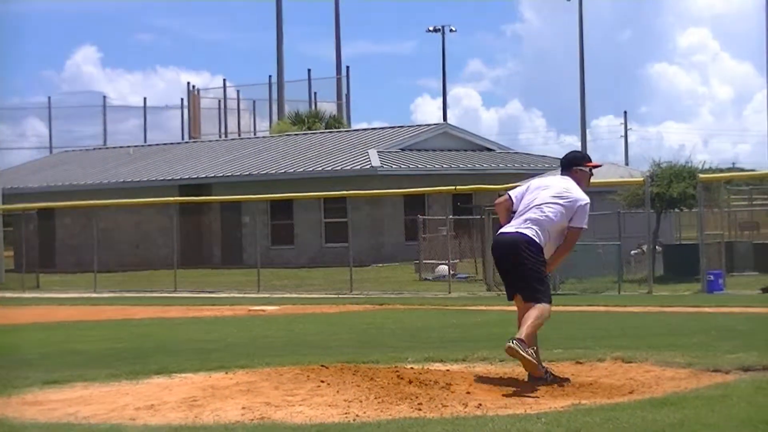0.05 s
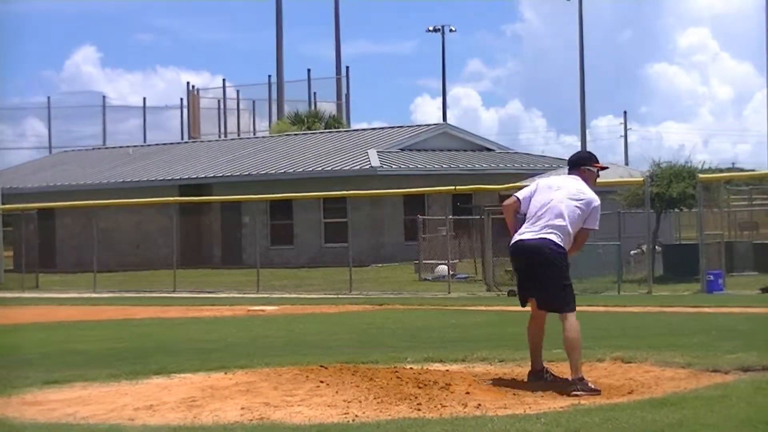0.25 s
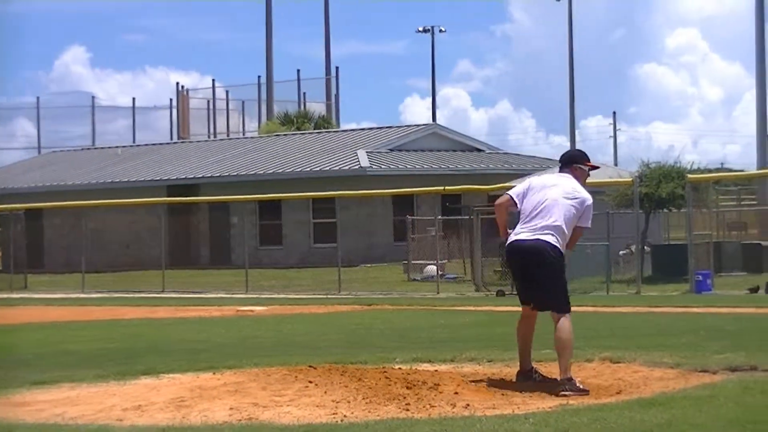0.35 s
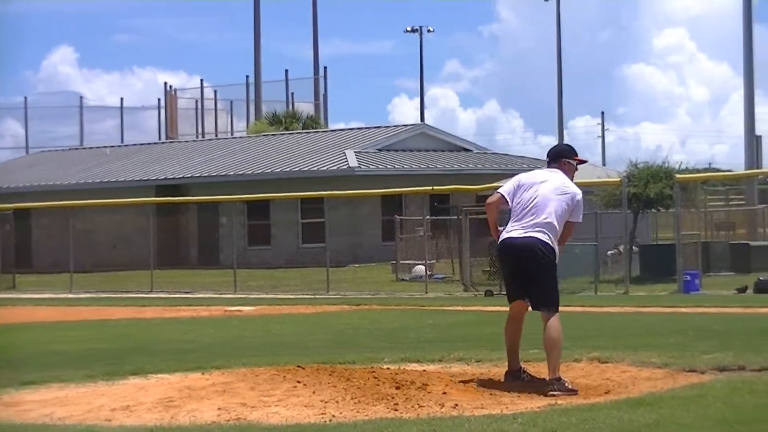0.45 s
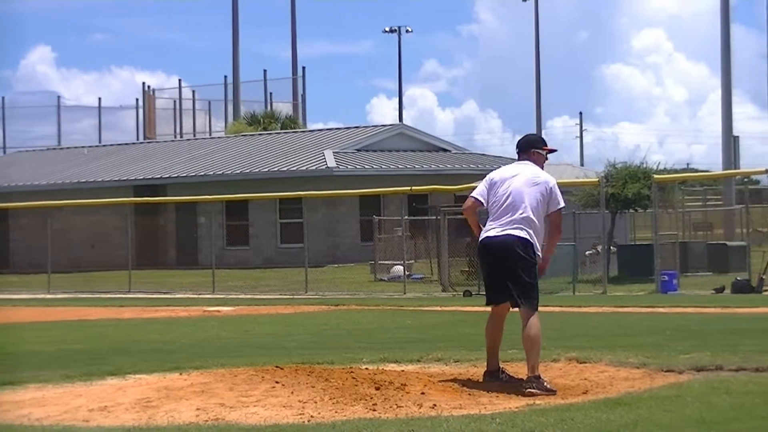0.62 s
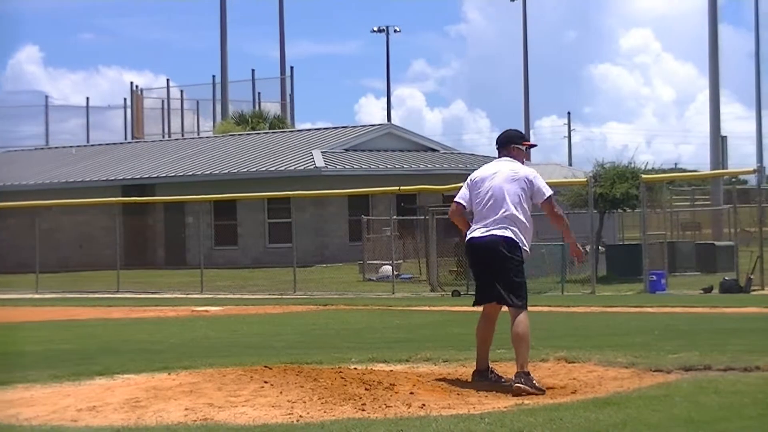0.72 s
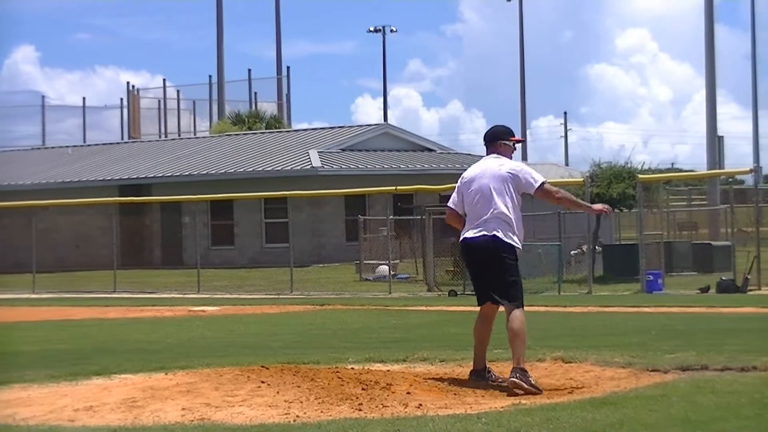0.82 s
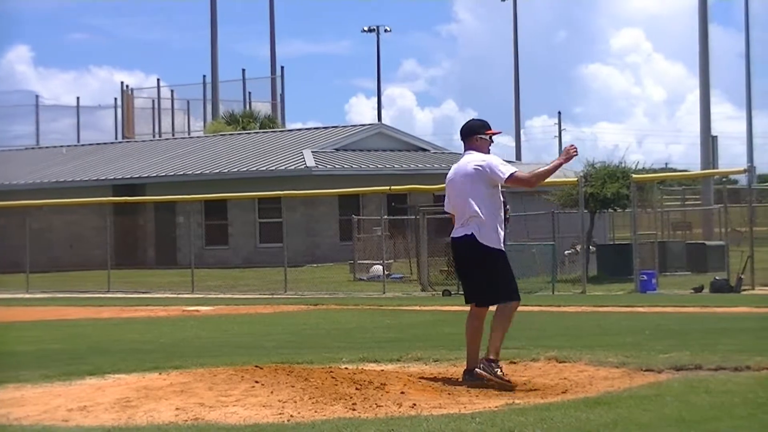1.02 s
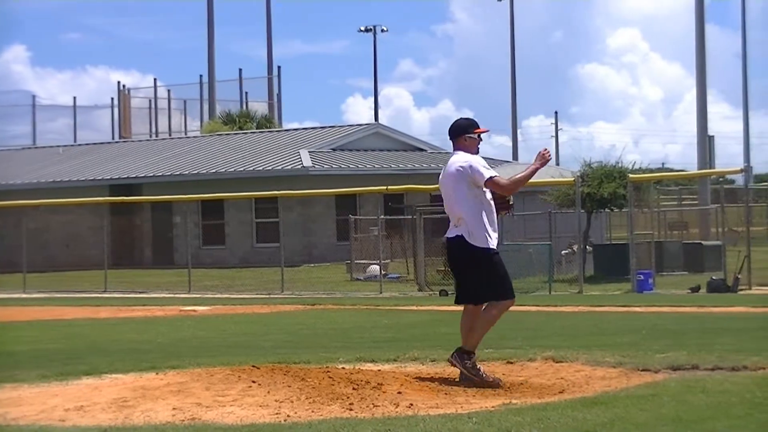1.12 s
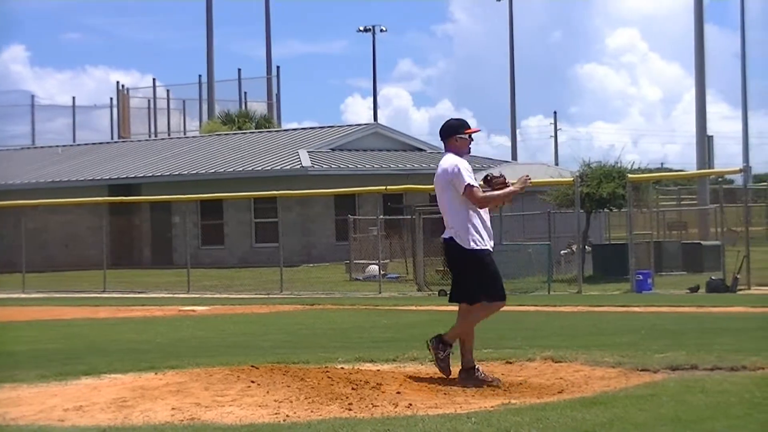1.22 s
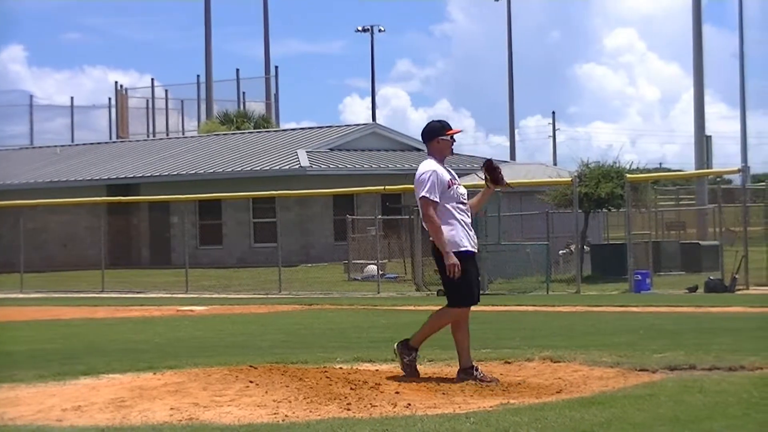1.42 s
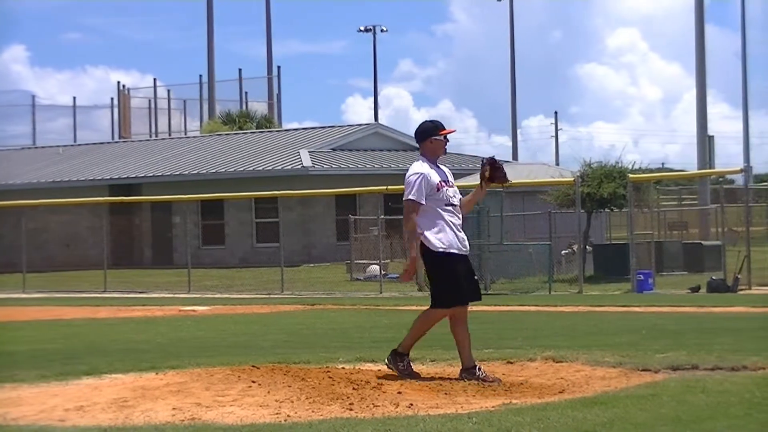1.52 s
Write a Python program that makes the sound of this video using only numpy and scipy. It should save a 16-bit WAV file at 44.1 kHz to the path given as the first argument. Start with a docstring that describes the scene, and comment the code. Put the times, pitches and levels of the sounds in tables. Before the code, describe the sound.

Close by on an outdoor ball field, a ball smacks once into a catcher's mitt. The crack bounces back in several quick slaps and fades, leaving a quiet, pulsing insect buzz and a far-off rumble.

```python
"""Catcher's mitt on an open ball field

Close to a stereo microphone, a pitched baseball cracks into a mitt and sets the leather ringing.
Fences and buildings farther off throw the crack back as distinct slaps and a scattered tail.
Out in the field, insects buzz in regular swells and a few faint taps sound over a distant rumble."""
import sys
import numpy as np
from scipy import signal
from scipy.fft import rfft, irfft
from scipy.io import wavfile
from scipy.ndimage import uniform_filter1d, map_coordinates

SR = 44100
rng = np.random.default_rng(int(sys.argv[2]) if len(sys.argv) > 2 else 0)


def wav_out(sig):
    """Save sig, one row per channel (or a flat mono array), as 16-bit PCM at SR to the path in sys.argv[1]."""
    wavfile.write(sys.argv[1], SR, np.round(np.clip(np.atleast_2d(sig).T, -1, 1) * 32767).astype(np.int16))


N = 68355
CATCH_S, ECHO_PAN_DB = .2426, -1

# Ring of the leather pocket and ball: f/Hz, relative level/dB, t60/s
MITT_MODES = [(235, -27, 0.01), (653, -26, .022), (1510, -11.5, 0.0034), (1837, -1, 0.0042),
              (3120, -15, 0.0099), (3860, 5, 0.0034), (4460, 1, 0.0031), (5540, -9, .003),
              (6930, -17.5, 0.011), (10350, -1, 0.0014), (11000, -14, 0.0018), (13700, -28, 0.0033)]
# Slaps off fences and walls, as they reach the microphone: t/s, relative level/dB, smear/s
SLAPS = [(0.263, -22, 0.0007), (0.2656, -17.5, 0.00063), (0.2846, -35, .0005), (0.297, -39, .002),
         (0.3149, -21, .001), (.3198, -18.5, .001), (.3402, -45, .001), (.3602, -30, .001),
         (0.3916, -24.5, 0.00058), (0.4568, -25, 0.00047), (0.4694, -27, 0.0036), (.4778, -29.5, .0012),
         (.5297, -28.5, 0.00033), (0.5855, -38, .004), (.5988, -36, .002), (0.6928, -29, .003)]
# Colour of those surfaces: f/Hz, gain/dB
SURFACE_COLOUR = [(300, -19), (1200, -12), (2100, 7.5), (3800, -4), (6000, -1.5), (10000, -4)]
# Colour of the scattered tail, and the filter that dulls it later on: f/Hz, gain/dB
SCATTER_COLOUR = [(200, -28), (700, -3), (1200, -8.5), (2000, 2.5), (2700, -5), (4000, -3), (5500, -6),
                  (8000, -10.5), (11000, -19.5), (15000, -46)]
LATE_COLOUR = [(4500, 6), (7000, -7.5), (12000, -33)]
# Dull returns from the buildings: t/s, level/dB, decay/s
BUILDING_RETURNS = [(.284, -35, 0.026), (0.357, -43, 0.034)]
# Colour of those returns: f/Hz, gain/dB
BUILDING_COLOUR = [(150, -13), (280, -1.5), (500, -3), (900, -3.5), (1500, -7), (4000, -55)]
# Crests of the insect buzz: t/s, relative level/dB
INSECT_SWELLS = [(.07, -1), (0.189, -1.5), (.31, -21), (.42, 0), (.53, -0.5), (.645, -1.5), (.755, -3),
                 (.805, -6), (.88, -3), (1.0, -0.5), (1.11, -0.5), (1.215, -1.5), (1.325, 0), (1.43, -2),
                 (1.515, -0.5)]
# Colour of the buzz: f/Hz, gain/dB
INSECT_COLOUR = [(4000, -68), (5700, -8), (6500, 3), (7200, 3.5), (8200, 2), (9200, -4.5), (10400, -13),
                 (12500, -66), (16000, -30)]
# Faint taps around the field: t/s, level/dB, decay/s, band centre f/Hz
FIELD_TAPS = [(.029, -46, 0.0052, 2500), (.045, -43.5, 0.01, 875), (.763, -41, 0.00066, 2000),
              (1.532, -41, 0.0017, 1780), (1.533, -47, 0.0073, 620)]
# Colour of the distant rumble: f/Hz, gain/dB
RUMBLE_COLOUR = [(25, -38), (60, -23), (110, -14.5), (200, -2.5), (330, -3), (600, 2), (930, 4.5),
                 (1400, 0), (2200, -5.5), (3800, -8.5), (5300, -13), (10000, -17), (15500, -28)]
# Stereo width of the rumble: f/Hz, side against mid level/dB
RUMBLE_WIDTH = [(50, -5), (300, -11), (1000, -16.5), (3000, -10), (10000, -28)]
# Imbalance of the two microphone capsules: f/Hz, left minus right level/dB
CAPSULE_BALANCE = [(60, -7), (125, -1.5), (250, 0.5), (500, 1.4), (1000, 0.5), (2800, 1.5), (5500, -1.7),
                   (13000, 0)]


def mitt(t, contact_s=.0001):
    """The ball's push sets the heavily damped leather ringing for a few milliseconds."""
    ring = sum(undb(db) * np.sin(2 * np.pi * hz * t) * fade(t, t60 / np.log(1000))
               for hz, db, t60 in MITT_MODES)
    return undb(1.5) * ring * (1 - fade(t, contact_s))


def catch(t, crack, graze_lead_s=.000381, ground_lag_s=.0022, thud_lag_s=.006, thud_hz=930):
    """Close up: the ball grazes, then seats; the crack bounces off the ground; the padding gives way."""
    age = t - CATCH_S
    delayed = lambda lag: map_coordinates(crack, [(age - lag) * SR])
    graze = undb(-10.5) * cut(delayed(-graze_lead_s), 3020, "high", order=1)
    ground = undb(-16) * cut(delayed(ground_lag_s), 5000, "low")
    padding = burst(age - thud_lag_s, decay_s=.0035)
    thud = undb(-30) * np.sqrt(SR / thud_hz / 2) * cut(padding, thud_hz, "low")
    close = pan(graze + delayed(0), -1.8) + pan(ground, 4) + pan(thud, 6)
    return cut(close, 177, "high", order=1)


def slap_echoes(t, crack, top_hz=10900, air_per_s=2.37):
    """Each fence or wall smears the crack by its depth; the air dulls the farther ones."""
    paths = sum(undb(db) * cut(smear(t - at, spread), top_hz * np.exp(-air_per_s * (at - CATCH_S)), "low")
                for at, db, spread in SLAPS)
    slaps = signal.fftconvolve(paths, crack)[:N]
    return pan(colour(slaps, SURFACE_COLOUR), ECHO_PAN_DB)


def scatter(t, fence_start_s=.2755, fence_end_s=.392, tail_start_s=.261, tail_t60_s=1):
    """Countless small reflections off near fences and the open field form a grainy tail that darkens."""
    age = np.maximum(t - fence_start_s, 0)
    release = fade(np.maximum(t - fence_end_s, 0), decay_s=.0044)
    fences = (age > 0) * undb(-37 - 55 * age) * release
    tail = undb(-43) * fade(t - tail_start_s, tail_t60_s / np.log(1000))
    level = np.hypot(fences, tail)
    grains = noise(SCATTER_COLOUR) * unit(undb(1.3 * walk(rate_hz=400)))
    bright = fade(age, decay_s=.15)
    mid = bright * grains + (1 - bright) * colour(grains, LATE_COLOUR)
    side = undb(-15.5) * noise(SCATTER_COLOUR)
    return level * (pan(mid, ECHO_PAN_DB) + np.array([side, -side]))


def buildings(t):
    """Buildings around the field return the low end of the crack as dull booms."""
    level = sum(undb(db) * fade(t - at, decay) for at, db, decay in BUILDING_RETURNS)
    return pan(cut(level * noise(BUILDING_COLOUR), 169, "high"), ECHO_PAN_DB)


def insects(t, swell_width_s=.021, tymbal_hz=300, rasp_depth=.24):
    """Out in the field, a tymbal rasp swells about nine times a second over a steady chorus."""
    swell = sum(undb(db) * np.exp(-.5 * ((t - at) / swell_width_s) ** 2) for at, db in INSECT_SWELLS)
    pulse_hz = tymbal_hz * (1 + .15 * walk(rate_hz=60))
    rasp = 1 + rasp_depth * np.sin(2 * np.pi * np.cumsum(pulse_hz) / SR)
    buzz = noise(INSECT_COLOUR) * swell * rasp
    chorus = undb(-7) * noise(INSECT_COLOUR)
    side = undb(-14) * noise(INSECT_COLOUR)
    return undb(-49.5) * (pan(buzz + chorus, 1.5) + np.array([side, -side]))


def taps(t):
    """Faint taps and scuffs on the field, each a short band of noise in the centre of the image."""
    return sum(undb(db) * np.sqrt(SR / hz / 2) * cut(burst(t - at, decay), [hz / 2, hz * 2], "band")
               for at, db, decay, hz in FIELD_TAPS)


def distant_rumble(t, drift_db_per_s=-.56):
    """Far off, a nearly steady rumble and hiss, perhaps of traffic, widest in the bass."""
    mid = noise(RUMBLE_COLOUR)
    side = colour(noise(RUMBLE_COLOUR), RUMBLE_WIDTH)
    return undb(-47.5 + drift_db_per_s * t) * (pan(mid, -.4) + np.array([side, -side]))


def undb(db):
    """Decibels to gain."""
    return 10 ** (np.asarray(db) / 20)


def unit(x):
    """Scale to an rms of 1."""
    return x / np.sqrt(np.mean(x ** 2))


def pan(x, db):
    """Place a sound in the stereo image, left minus right in dB."""
    return x * undb(np.array([[db], [-db]]) / 2)


def colour(x, points):
    """Filter by a curve of points: f/Hz, gain/dB."""
    hz, db = np.array(points).T
    curve_db = np.interp(np.log(np.fft.rfftfreq(N, 1 / SR) + 1), np.log(hz), db)
    return irfft(rfft(x) * undb(curve_db), N)


def noise(points):
    """Noise of a given colour, with an rms of 1."""
    return unit(colour(rng.standard_normal(N), points))


def cut(x, hz, kind, order=2):
    """Low-, high- or band-pass."""
    return signal.sosfilt(signal.butter(order, np.minimum(hz, SR / 2 - 1), kind, fs=SR, output="sos"), x)


def fade(t, decay_s):
    """A sudden start at t = 0, then exponential decay."""
    return (t >= 0) * np.exp(-np.maximum(t, 0) / decay_s)


def burst(t, decay_s):
    """White noise that starts at t = 0 and dies away."""
    return rng.standard_normal(N) * fade(t, decay_s)


def smear(t, spread_s):
    """A click spread over a few milliseconds, its spectrum kept flat."""
    spectrum = rfft(burst(t, spread_s))
    return irfft(spectrum / (np.abs(spectrum) + 1e-9), N)


def walk(rate_hz):
    """A smooth random wander with an rms of 1."""
    hold = int(SR / rate_hz)
    steps = np.repeat(rng.standard_normal(N // hold + 1), hold)
    return unit(uniform_filter1d(steps, hold)[:N])


def scene():
    """The catch up close, its echoes from farther off, and the field behind them."""
    t = np.arange(N) / SR
    crack = mitt(t)
    catch_and_echoes = catch(t, crack) + slap_echoes(t, crack) + scatter(t) + buildings(t)
    return catch_and_echoes + insects(t) + taps(t) + distant_rumble(t)


def record(dry, top_hz=15800):
    """Two slightly unlike capsules; the recorder clips the tip of the crack and cuts the top."""
    capsules = np.array([colour(channel, [(hz, sign * db / 2) for hz, db in CAPSULE_BALANCE])
                         for channel, sign in zip(dry, (1, -1))])
    top_cut = signal.ellip(8, .2, 70, top_hz, fs=SR, output="sos")
    return signal.sosfilt(top_cut, np.clip(capsules, -1, 1))


dry = scene()
out = record(dry)
wav_out(out)
```